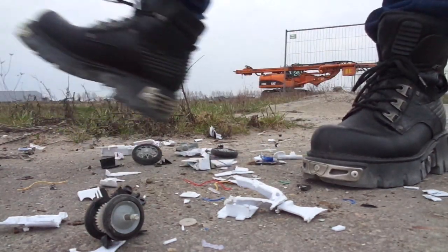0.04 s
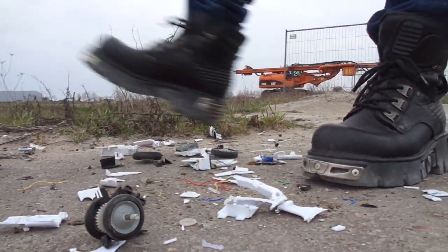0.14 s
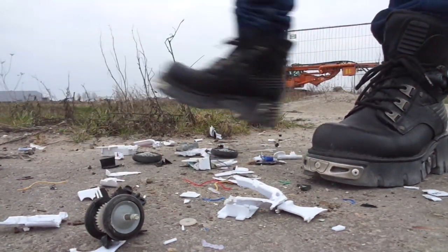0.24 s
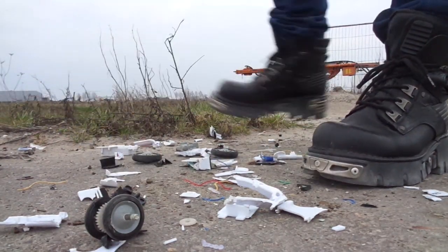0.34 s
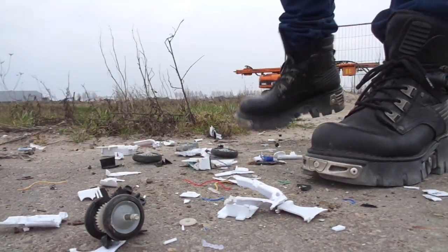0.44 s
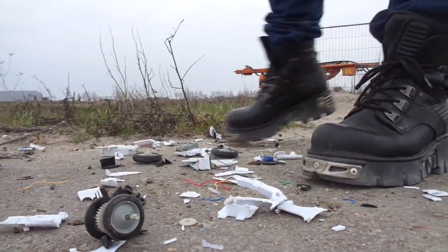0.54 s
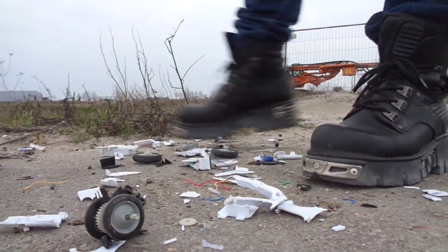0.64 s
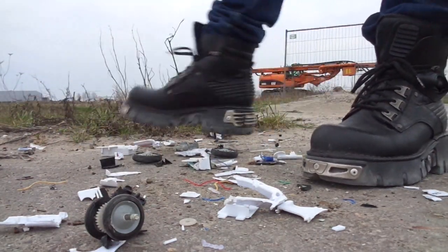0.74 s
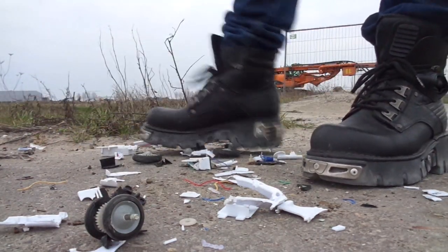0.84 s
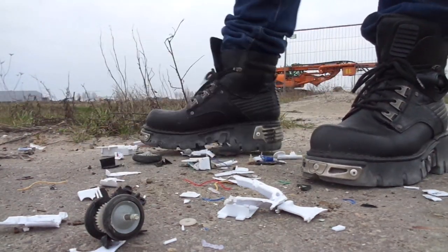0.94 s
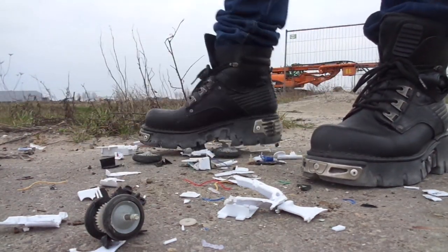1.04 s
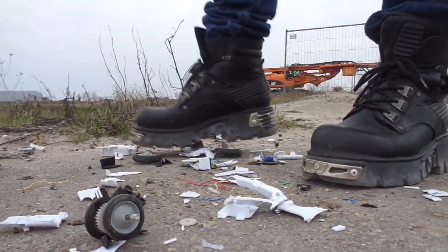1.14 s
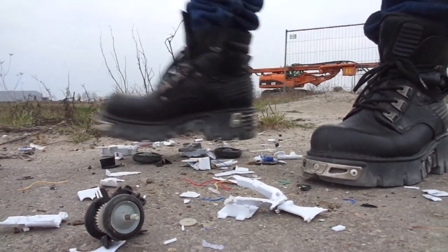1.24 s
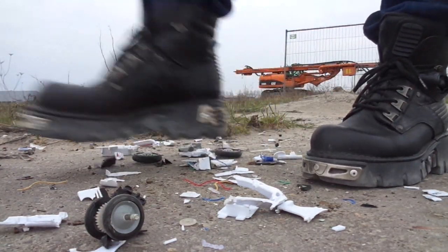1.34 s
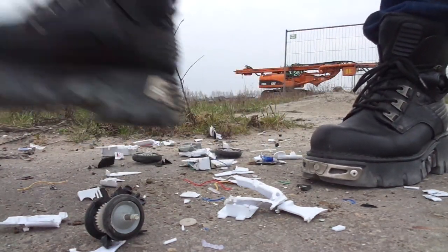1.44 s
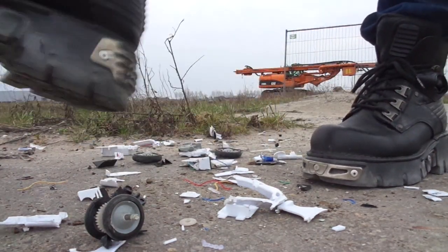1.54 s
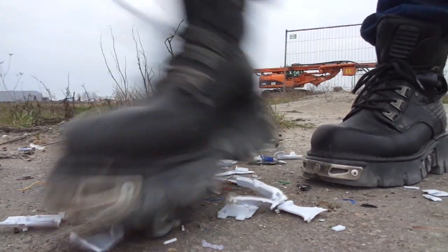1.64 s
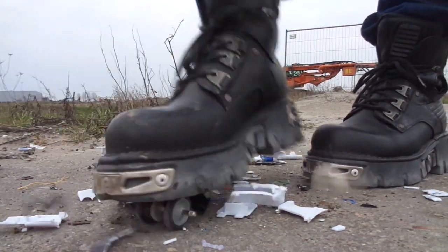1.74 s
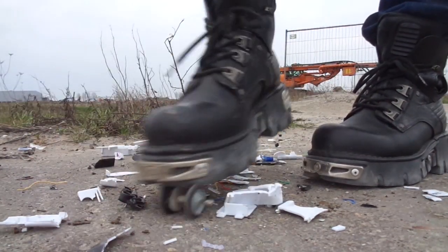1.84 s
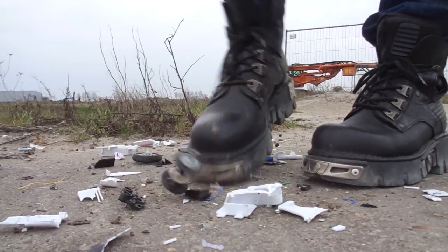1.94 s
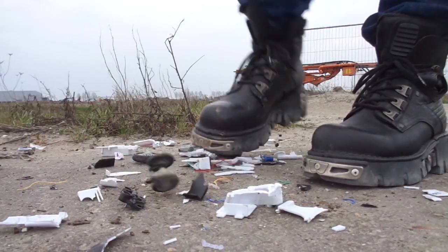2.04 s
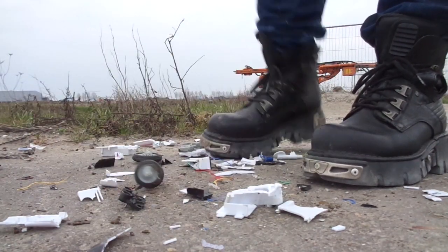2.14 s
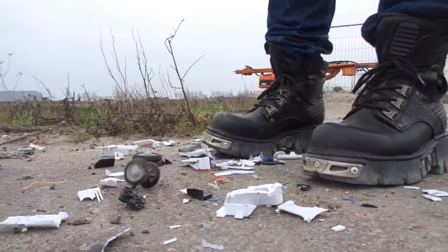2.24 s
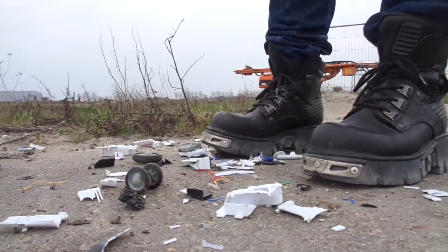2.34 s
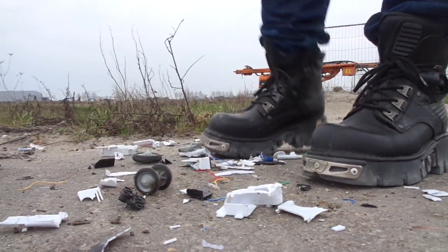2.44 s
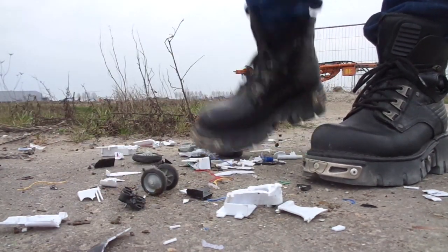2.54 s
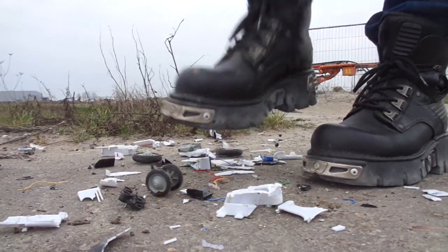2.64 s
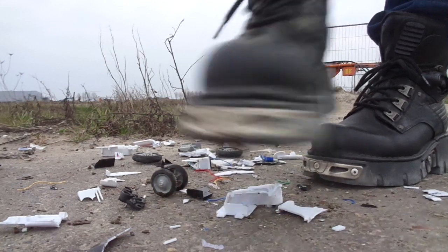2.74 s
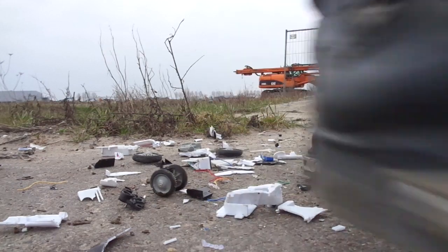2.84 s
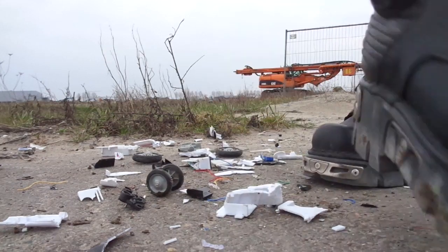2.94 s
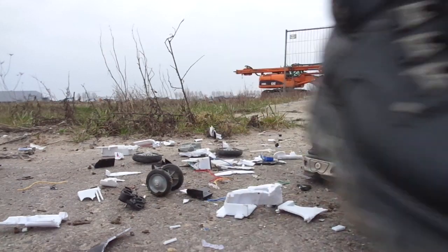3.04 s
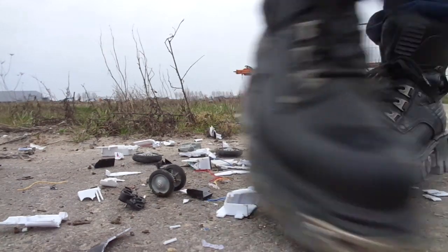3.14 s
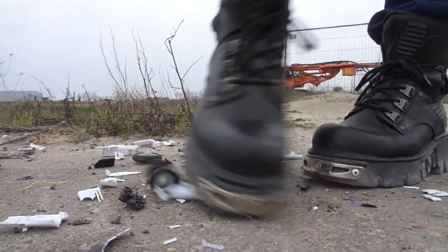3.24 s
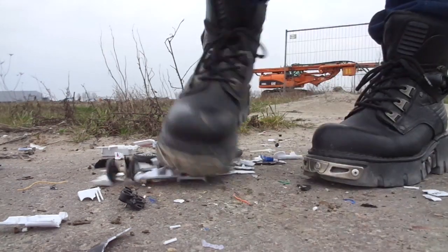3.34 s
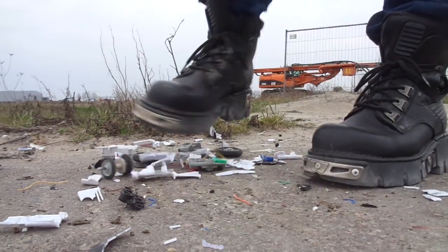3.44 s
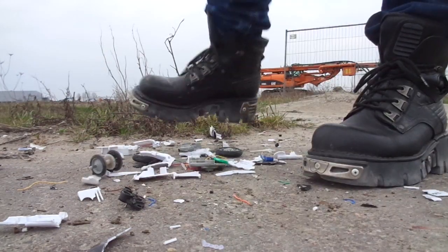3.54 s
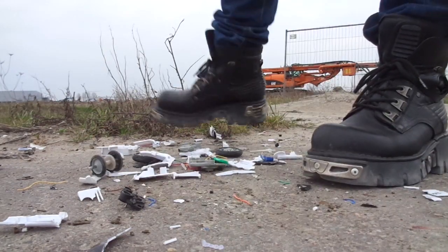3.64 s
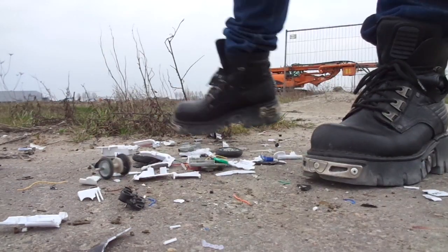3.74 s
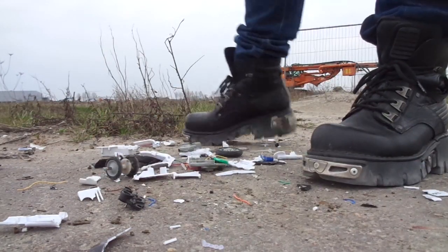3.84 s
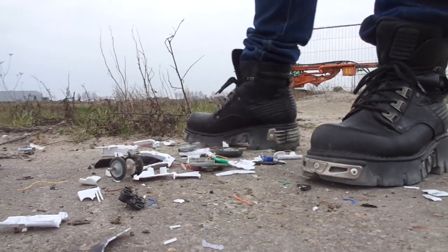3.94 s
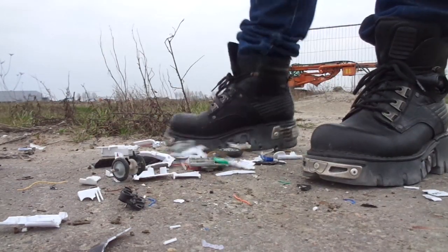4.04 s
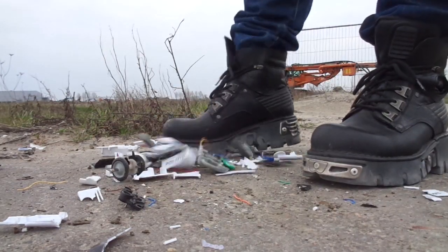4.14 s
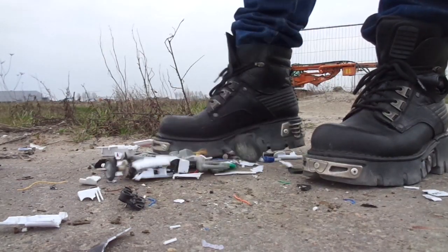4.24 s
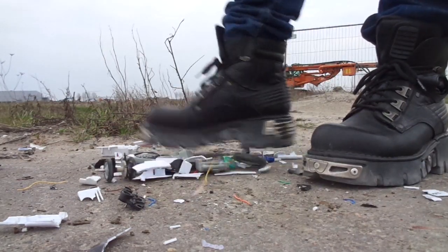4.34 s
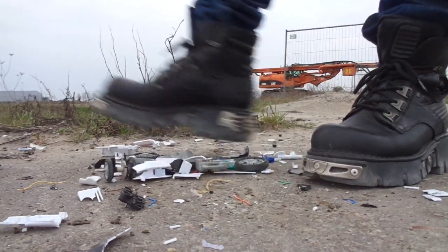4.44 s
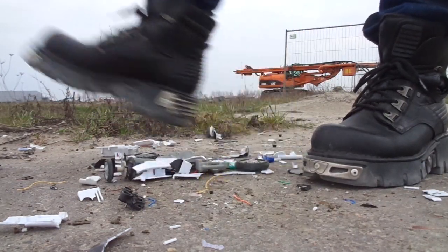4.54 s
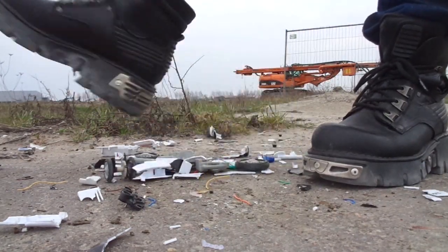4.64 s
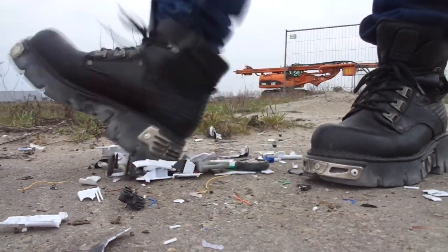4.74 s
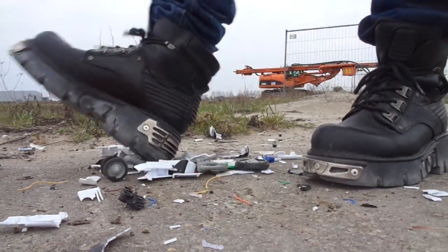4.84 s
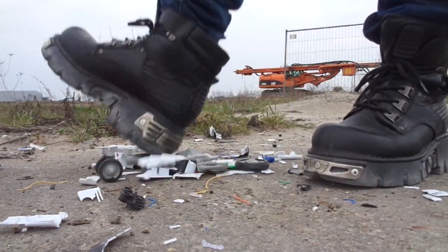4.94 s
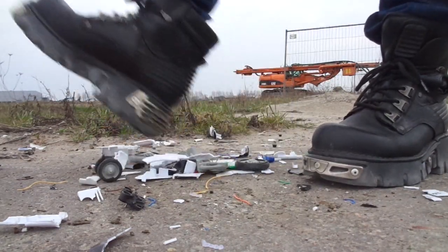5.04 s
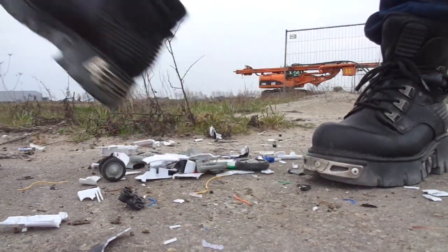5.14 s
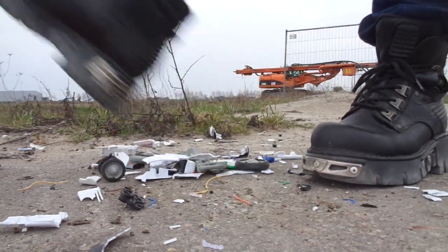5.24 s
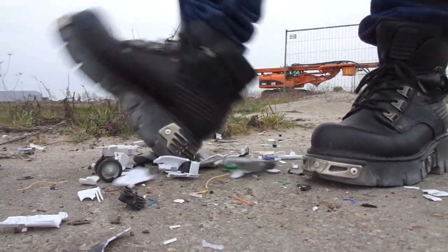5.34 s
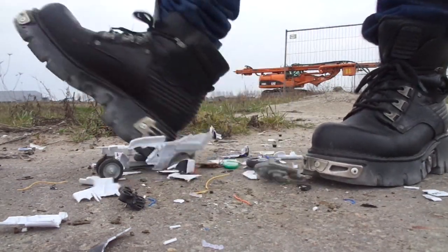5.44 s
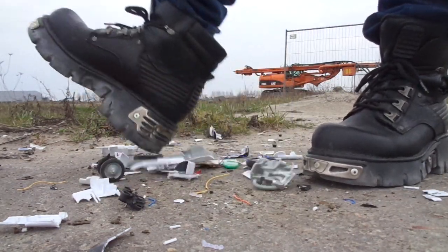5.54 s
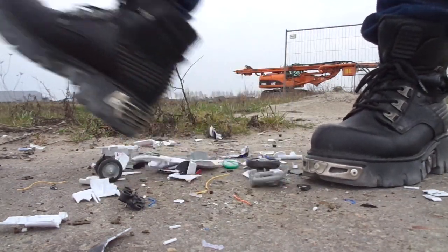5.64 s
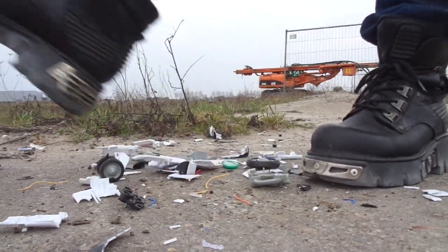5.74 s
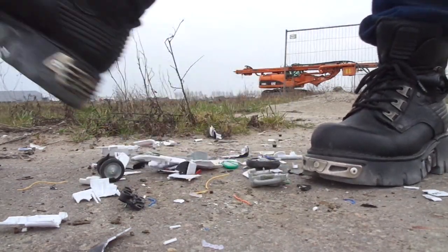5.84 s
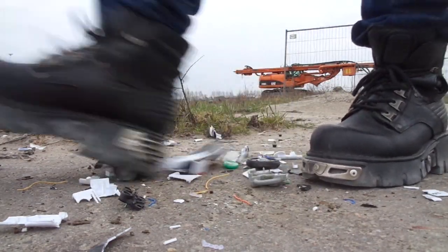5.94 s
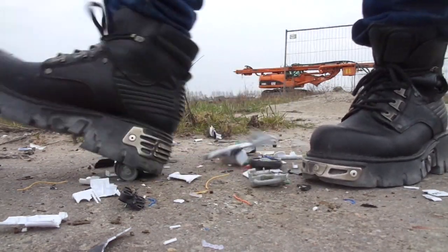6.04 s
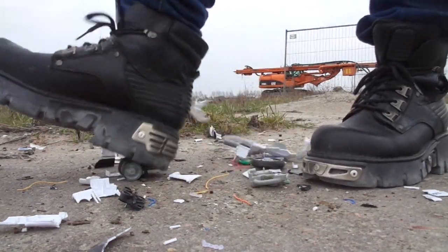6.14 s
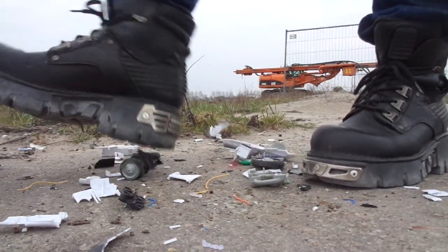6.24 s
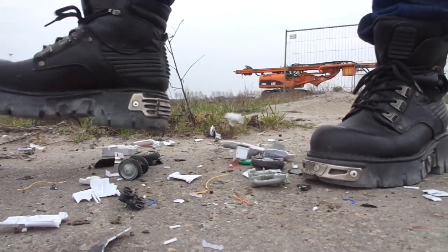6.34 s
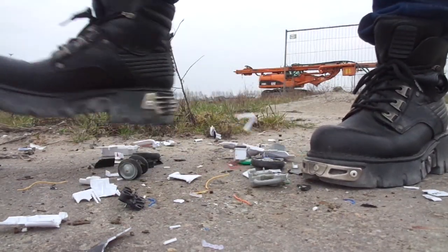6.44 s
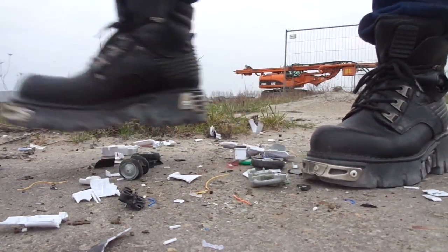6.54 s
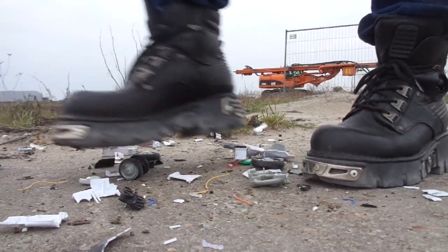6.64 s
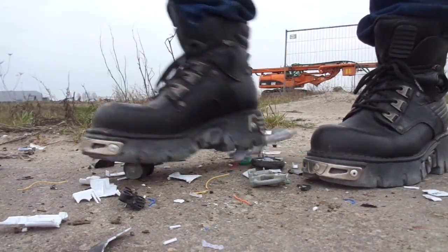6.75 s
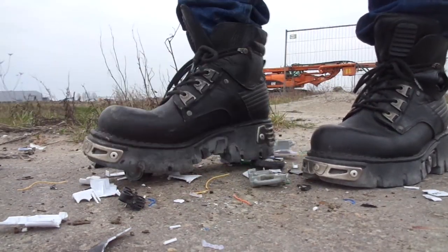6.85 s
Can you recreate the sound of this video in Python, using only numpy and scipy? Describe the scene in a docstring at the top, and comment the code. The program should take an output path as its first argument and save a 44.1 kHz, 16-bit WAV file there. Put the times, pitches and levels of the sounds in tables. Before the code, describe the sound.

Heavy boot stamps crack brittle plastic on pavement, with sharp loud snaps, crunching scrapes and clattering fragments, while a vehicle's tyre roar fades away.

```python
"""On open pavement, heard from near the ground, a heavy boot stamps on a brittle plastic toy.
Shells tear in bursts of tiny fractures, the loudest clipped; random clicks drive the plastic's ringing modes.
The sole thuds as low-filtered clicks and grinds splinters and grit; chips and loose pieces tick and clatter.
Behind it filtered noise makes the fading tyre roar and narrow whine of a receding vehicle, far traffic and breeze."""
import sys
import numpy as np
from scipy import signal
from scipy.fft import rfft, irfft
from scipy.io import wavfile
from scipy.ndimage import uniform_filter1d

SR = 44100
rng = np.random.default_rng(int(sys.argv[2]) if len(sys.argv) > 2 else 0)


def put_to_file(sound):
    """Save the sound as 16-bit audio at rate SR, in the file named by the first command-line argument."""
    columns = np.atleast_2d(sound).T  # one column per channel
    safe = np.clip(columns, -1, 1)
    whole_steps = np.round(safe * 32767)
    wavfile.write(sys.argv[1], SR, whole_steps.astype(np.int16))


N = 303849
TIME = np.arange(N) / SR
RING_SIZE = 6000  # samples in one short plastic sound
TOP_HZ = 15300
SIDE_DB = -33  # gain of the separate noise draw that is opposite in the two channels

# outdoor air, spectrum before levelling: (frequency [Hz], density [dB per Hz])
AIR_SPECTRUM = [(20, -5), (60, -12.5), (150, -25.5), (260, -11), (500, -10), (900, -5), (1400, -8.5),
                (2000, -10.5), (3300, -25), (6000, -28), (15000, -30)]
# puffs of air on the microphone: (time [s], level [dB])
AIR_PUFFS = [(.785, -46), (1.15, -55), (1.39, -48), (1.82, -44), (3.7, -52), (3.97, -52)]
AIR_DB = -48.5
BREEZE_DB, BREEZE_FADE_DB_PER_S, PUFF_HALF_WIDTH_S = -54.5, 0.87, 0.063

# tyre roar, spectrum before levelling: (frequency [Hz], density [dB per Hz])
ROAD_SPECTRUM = [(60, -34), (200, -29), (350, -9), (520, 0), (750, 8), (1050, 5), (1400, -3), (2000, -5.5),
                 (2700, -23), (4000, -38.5), (8000, -47), (15000, -51.5)]
# swells of the roar: (time [s], half width [s], level [dB])
ROAR_SWELLS = [(0.0, 0.06, -31.5), (.55, 0.21, -31.5), (.76, 0.13, -34.5), (1.268, 0.2, -32)]
# the vehicle's drive whine: (time [s], mean pitch [Hz], level before the partials' own [dB])
WHINE_PATH = [(0, 658, -44.5), (1.5, 656, -40.5), (3, 665, -44), (3.62, 667, -47.5), (3.8, 653, -42.5),
              (4.5, 626.4, -62.5), (6.89, 591, -63)]
# partials of the whine: (multiple, width [Hz], mean level [dB]); they are numbered in row order
WHINE_BANDS = [(1, 60, -15), (2, 250, -8.5), (3, 163, -4)]
ROAD_DB, ROAD_FADE_DB_PER_S = -35, 6

# ringing of the plastic: (frequency before detuning [Hz], level before a random share [dB], undamped t60 [s])
PLASTIC_MODES = [(1235, -3, 0.061), (1890, -16.5, 0.15), (2045, -10, 0.16), (2393, -15, 0.34),
                 (2714, 4, 0.039), (3021, 6, 0.043), (3335, -13, 0.032), (3926, -3.5, 0.084),
                 (4550, -9, 0.037), (4420, 4.5, 0.035), (4584, -0.5, 0.02), (4890, 1.5, 0.083),
                 (5320, 4, 0.058), (6400, 3.5, 0.031), (6900, -9.5, 0.041), (7000, 2.5, 0.022),
                 (8760, -15.5, .04), (9430, -1.5, .03)]

# larger loose pieces knocking on the pavement and each other: (time [s], level [dB], centre [Hz])
LOOSE_PIECES = [(0.058, -37, 3600), (0.101, -30.5, 3230), (0.125, -25, 5500), (0.199, -37.5, 4630),
                (0.244, -46.5, 5500), (1.08, -45.5, 6200), (1.158, -35, 3730), (1.213, -31, 2060),
                (1.84, -32, 4480), (1.916, -35, 8100), (1.967, -33, 4020), (2.142, -33, 2680),
                (2.351, -41, 2900), (2.583, -45.5, 3750), (3.024, -20, 3330), (3.168, -20, 4600),
                (3.309, -27, 3020), (3.357, -16, 4060), (3.402, -21.5, 3570), (3.424, -24.5, 4300),
                (4.076, -25.5, 3800), (4.148, -28, 3640), (4.172, -24.5, 3650), (4.202, -24, 2400),
                (4.253, -25, 4100), (4.316, -34.5, 4430), (4.967, -31, 4460), (5.053, -37, 3810),
                (5.41, -28.5, 6160), (5.436, -16.5, 4100), (5.447, -15.5, 3600), (5.477, -27, 3660),
                (5.534, -26, 4240), (5.566, -29, 4040), (5.583, -21.5, 4900), (5.622, -28.5, 3340),
                (5.67, -31, 4570), (6.035, -19.5, 3830), (6.102, -26.5, 3150), (6.125, -25, 2960),
                (6.181, -32, 4460), (6.255, -32.5, 6700), (6.355, -37.5, 6150), (6.535, -42, 4990),
                (6.751, -27, 3760), (6.8, -20, 4260), (6.858, -28, 4030)]
# colour of those knocks: (frequency [Hz], gain [dB])
CLATTER_SPECTRUM = [(200, -41), (700, 2.5), (1400, 9), (2600, -2), (5000, -6.5), (7200, -5), (8500, -5.5),
                    (11000, -9), (15000, -12)]

# splinters and grit pushed over the pavement; finer bits are brighter:
# (time [s], length [s], level [dB], tilt [dB per octave])
SCRAPE_PUSHES = [(0.036, .1, -49, 6.5), (0.193, 0.11, -58, 8.5), (0.851, 0.018, -31.5, 9.5),
                 (1.099, .13, -58, 13), (1.435, .04, -56, 5), (1.655, 0.048, -29, 4.5),
                 (1.802, 0.19, -49, 10.5), (2.0, 0.14, -52.5, 7), (2.524, 0.088, -56, -3),
                 (3.02, 0.13, -25.5, 1), (3.181, .13, -20.5, 3.3), (3.348, .16, -40, 7.5),
                 (3.953, 0.046, -47.5, 5), (4.051, 0.04, -31, -7), (4.104, .165, -32, -1.5),
                 (4.285, .08, -41.5, 2), (4.775, 0.019, -34.5, 1), (4.839, .045, -37.5, -2),
                 (4.931, 0.028, -40.5, 3.5), (5.336, 0.023, -32.5, -1.5), (5.421, 0.044, -28, -3.5),
                 (5.51, .15, -43.5, -3.5), (5.96, 0.032, -19, 4.5), (5.997, 0.13, -37, -3),
                 (6.158, 0.064, -41.5, -1.5), (6.269, .15, -55, -1), (6.76, 0.056, -33.5, -4)]
# colour of the grinding before levelling: (frequency [Hz], gain [dB])
GRIND_SPECTRUM = [(150, -15), (500, -6), (1200, -5), (2200, -5.5), (3200, -4.5), (5000, -10), (7000, -9.5),
                  (8500, -17.5), (10500, -17.5), (12000, -24), (15000, -26)]
SCRAPE_ATTACK_S, SCRAPE_RELEASE_S = 0.017, 0.016
# stirred-up bits trickle on after each scrape, the more the longer it lasted
TRICKLE_DB, TRICKLE_S = -12, 0.035
# the weight on the standing boot keeps a trace of grit moving; tilt in dB per octave
RESTING_GRIT_DB, RESTING_TILT_DB = -68.5, 0.5
CATCH_DB = 4.5  # how unevenly splinters of each size catch and let go

# small chips flick away at random; level relative to the grinding, which they trail by their flight time
CHIPS_PER_S, CHIP_DB, CHIP_SPREAD_DB, CHIP_FLIGHT_S = 50, -1, 3.5, 0.017
CHIP_HZ, CHIP_SPREAD_OCTAVES = 4330, 0.54  # spread is each way

# the rubber sole pressing down: (time [s], push time [s], level [dB], centre [Hz])
SOLE_PUSHES = [(0.764, 0.055, -43, 137), (0.853, 0.014, -35, 296), (1.663, 0.0094, -20, 294),
               (1.673, 0.016, -17, 1050), (1.767, 0.062, -40.5, 150), (1.904, 0.04, -43.5, 166),
               (3.045, 0.1, -27.5, 305), (3.19, 0.12, -57, 453), (3.974, 0.028, -35, 791),
               (4.762, 0.012, -30, 220), (5.332, 0.022, -50, 300), (5.965, 0.0051, -20, 274),
               (6.729, 0.0043, -33, 403)]
# spectrum of the sole: (multiple of its centre, gain [dB])
SOLE_SPECTRUM = [(.4, -34.5), (.75, -10.5), (.95, 0), (1.3, -8), (1.7, -11), (3, -21), (8, -47), (30, -77)]

# plastic shells breaking:
# (time [s], nominal tearing time [s], level [dB], centre [Hz], level of the flexing shell [dB], resonance [Q])
SHELL_CRACKS = [(0.849, 0.0056, -17, 2680, -16.5, 1), (0.853, 0.0032, -1.5, 2920, -19, 1.7),
                (0.8595, 0.0065, -8, 3550, -14, 0.3), (0.8785, 0.012, -31.5, 2820, -28, 0.47),
                (1.661, 0.0081, -10.5, 5830, -14, 0.47), (1.6738, 0.0011, -10.5, 1900, -9, 3.6),
                (1.6855, 0.0012, -10, 5350, -14.5, 0.25), (1.701, .0017, -8, 1910, -10, 1.1),
                (1.957, 0.0034, -28.5, 3400, -33.5, 7.1), (2.166, 0.0028, -22, 1800, -32.5, 5.2),
                (3.004, 0.012, -25, 2460, -38, 0.69), (3.0397, 0.0059, -12, 3000, -26, 1.5),
                (3.0805, 0.0047, -13.5, 2380, -23, 3.5), (3.1285, 0.00078, -9.5, 3970, -33, 2.8),
                (3.188, 0.0087, -15.5, 4440, -31, 5.8), (3.211, 0.0045, -18, 3200, -28, 2.6),
                (3.3432, 0.0015, -7.5, 4200, -22.5, 1.76), (4.058, 0.018, -23.5, 3300, -35, 0.82),
                (4.115, 0.011, -20, 4180, -31.5, 1.2), (4.7611, .009, -6.5, 3280, -29, 0.55),
                (4.77, 0.003, 5.5, 5800, -20, 4.9), (4.7813, 0.0042, -17, 5200, -25.5, 0.6),
                (5.3302, .011, 0.5, 3200, -19, 0.89), (5.342, 0.0028, -11.5, 2800, -16, 1.23),
                (5.951, .0021, -6.5, 6500, -18.5, 4.4), (5.968, 0.0055, -14.5, 4200, -16.5, 1.6),
                (5.9783, 0.014, -12, 4330, -33, 2), (6.7821, 0.0069, -18.5, 4200, -36.5, 3.1)]
# colour of a crack: (frequency [Hz], gain [dB])
CRACK_SPECTRUM = [(200, -24.5), (700, -13.5), (1400, 4), (2600, 2.5), (5000, -3.5), (7200, 1.5),
                  (8500, -2.5), (11000, -6.5), (15000, -8.5)]
# a shell buckles under the sole in a quick run of snaps, all in one band
BUCKLE_START_S, BUCKLE_SNAPS_PER_S, BUCKLE_SCATTER_S = 3.0505, 75, 0.001
BUCKLE_TEAR_S, BUCKLE_DB, BUCKLE_HZ, BUCKLE_FLEX_DB, BUCKLE_Q = 0.0041, -19, 2440, -27.5, 5


def undb(db):
    """Decibels to amplitude."""
    return 10 ** (np.asarray(db) / 20)


def unit(x):
    """Scale to rms 1."""
    return x / np.sqrt(np.mean(x ** 2))


def burst(x, db, length):
    """Give x the energy of a sound that holds db for length seconds."""
    return x * undb(db) * np.sqrt(length * SR / np.sum(x ** 2))


def curve(rows, axis=1):
    """One column of a table over time, joined by straight lines."""
    rows = np.array(rows)
    return np.interp(TIME, rows[:, 0], rows[:, axis])


def add(out, s, x):
    """Mix x into out at s seconds."""
    i = max(int(s * SR), 0)
    out[i:i + len(x)] += x[:max(N - i, 0)]


def swell(s, width):
    """A smooth rise and fall around s seconds."""
    return np.exp(-((TIME - s) / width) ** 2)


def walk(rate):
    """Slow random wander with rms 1, about rate new targets a second."""
    targets = np.interp(TIME * rate, np.arange(2000), rng.standard_normal(2000))
    return unit(uniform_filter1d(targets, int(SR / rate)))


def band(x, hz, q):
    """Two-pole resonance, gain 1 at the centre; centre and bandwidth stay within 0.4 of the sample rate."""
    limit = 0.4 * SR
    hz = min(hz, limit)
    b, a = signal.iirpeak(hz, max(q, hz / limit), fs=SR)
    return signal.lfilter(b, a, x)


def colour(x, points, size=4096):
    """Causal minimum-phase filter with the spectrum of (Hz, dB) points."""
    hz, db = np.transpose(points)
    bins = np.fft.rfftfreq(size, 1 / SR) + 1
    gain = undb(np.interp(np.log(bins), np.log(hz), db))
    # folding the cepstrum forward puts the energy as early as possible
    cepstrum = irfft(np.log(gain))
    cepstrum[1:size // 2] *= 2
    cepstrum[size // 2 + 1:] = 0
    response = irfft(np.exp(rfft(cepstrum)))
    return signal.fftconvolve(x, response)[:len(x)]


def grains(rate, spread_db, size):
    """Random clicks of either sign: many small and a few large, or the reverse for a negative spread."""
    chance, strength, sign = rng.random((3, size))
    strength = np.minimum(-np.log(1 - strength), 4)
    return (chance < rate / SR) * undb(spread_db * strength) * np.sign(sign - 0.5)


def piece(ring_db, detune=0.034, damping=1, contact_s=0.0006):
    """Response of one piece of plastic: a rough, hard click plus its own mix of decaying modes."""
    hz, db, t60 = np.transpose(PLASTIC_MODES)[:, :, None]
    shift, share = rng.standard_normal((2, len(PLASTIC_MODES), 1))
    t = np.arange(RING_SIZE) / SR
    tones = np.sin(2 * np.pi * hz * (1 + detune * shift) * t)
    decay = np.exp(-np.log(1000) * t * damping / t60)
    ring = np.sum(share * undb(db) * tones * decay, axis=0)
    click = rng.standard_normal(RING_SIZE) * np.exp(-t / contact_s)
    return unit(click) + undb(ring_db) * unit(ring)


def air():
    """Far traffic as coloured noise, and a light breeze fluttering low on the microphone, with puffs of air
    pushed by the moving boot."""
    far = unit(colour(rng.standard_normal(N), AIR_SPECTRUM)) * undb(AIR_DB + 0.5 * walk(1.7))
    rumble = band(band(rng.standard_normal(N), 47, q=0.7), 68, q=0.7)
    breeze = unit(rumble * undb(3.4 * walk(15)))
    strength = undb(BREEZE_DB - BREEZE_FADE_DB_PER_S * TIME)
    strength = strength + sum(undb(db) * swell(s, PUFF_HALF_WIDTH_S) for s, db in AIR_PUFFS)
    return far + breeze * strength


def roar_level():
    """Strength of the tyre roar: a steady fade as the vehicle recedes, with swells added in power."""
    receding = undb(ROAD_DB - ROAD_FADE_DB_PER_S * TIME)
    swells = sum((undb(db) * swell(s, width)) ** 2 for s, width, db in ROAR_SWELLS)
    return np.sqrt(receding ** 2 + swells)


def vehicle():
    """Tyre roar is coloured noise; the whine is narrow noise bands on carriers that sink in pitch overall."""
    roar = unit(colour(rng.standard_normal(N), ROAD_SPECTRUM)) * roar_level() * undb(2.0 * walk(10))
    pitch = curve(WHINE_PATH) * (1 + 0.009 * walk(13))
    phase = 2 * np.pi * np.cumsum(pitch) / SR
    whine = 0
    for k, (_, width, db) in enumerate(WHINE_BANDS, 1):
        low_pass = signal.butter(2, width / 2, fs=SR, output="sos")
        a, b = signal.sosfilt(low_pass, rng.standard_normal((2, N)))
        partial = unit(a * np.cos(k * phase) + b * np.sin(k * phase))
        whine = whine + undb(db + 2.0 * walk(9)) * partial
    return roar + whine * undb(curve(WHINE_PATH, axis=2))


def clatter():
    """Each loose piece lands on a corner, chatters down onto its side and rings briefly at its own pitch."""
    out, t = np.zeros(N), np.arange(RING_SIZE) / SR
    for s, db, hz in LOOSE_PIECES:
        landing = grains(rate=7000, spread_db=-1.0, size=RING_SIZE) * np.exp(-(t / 0.0035) ** 2)
        chatter = grains(rate=1500, spread_db=-1.5, size=RING_SIZE) * t * np.exp(-t / 0.0046)
        contact = unit(landing) + undb(-4) * unit(chatter)
        body = piece(ring_db=-10.0, detune=0.05, damping=1.12, contact_s=0.00029)
        ring = signal.fftconvolve(contact, body)[:RING_SIZE]
        knock = colour(band(ring, hz, q=2.52), CLATTER_SPECTRUM)
        add(out, s, burst(knock, db, 0.0053))
    return out


def scraping():
    """Level and tilt of the grinding: each scrape bites, holds and lets go, then its debris trickles to rest."""
    total = np.zeros((2, N))  # power, and power times tilt
    t = np.arange(SR // 2) / SR
    for s, length, db, tilt in SCRAPE_PUSHES:
        attack = np.minimum(t / SCRAPE_ATTACK_S, 1)
        release = np.exp(-np.maximum(t - length, 0) / SCRAPE_RELEASE_S)
        power = (undb(db) * attack * release) ** 2
        add(total[0], s, power)
        add(total[1], s, tilt * power)
    keep, resting = np.exp(-1 / (TRICKLE_S * SR)), undb(RESTING_GRIT_DB) ** 2
    trickle = signal.lfilter([1 - keep], [1, -keep], total)
    power, brightness = total + undb(TRICKLE_DB) ** 2 * trickle
    level_db = 10 * np.log10(power + resting)
    tilt = (brightness + resting * RESTING_TILT_DB) / (power + resting)
    return level_db, tilt


def chips(count=8):
    """Small chips tick at random times in a few registers, each register with its own ring, as loud as the sole
    has stirred them."""
    db, _ = scraping()
    stirred = undb(np.interp(TIME - CHIP_FLIGHT_S, TIME, db) + CHIP_DB)
    out = np.zeros(N)
    for octave in np.linspace(-1, 1, count) * CHIP_SPREAD_OCTAVES:
        body = piece(ring_db=-1.5, detune=0.04, damping=1.3, contact_s=0.0011)
        tick = burst(band(body, CHIP_HZ * 2 ** octave, q=1.82), 0, 0.0044)
        waits = rng.exponential(count / CHIPS_PER_S, 100)
        sizes = rng.uniform(-1, 1, 100)
        for s, size in zip(np.cumsum(waits), sizes):
            if s < TIME[-1]:
                add(out, s, tick * stirred[int(s * SR)] * undb(CHIP_SPREAD_DB * size))
    return out


def grinding(count=14):
    """Splinters catch and slip under the same sole, each in its own register, over fine grit."""
    db, tilt = scraping()
    # hard grinding is a dense crunch; as it eases, single slips stand apart
    crowding = undb(0.5 * (np.maximum(db, -45) + 23))
    judder, splinters = 2.12 * walk(110), 0  # judder in dB
    for hz in np.geomspace(1100, 12000, count):
        slips = grains(rate=300 * crowding, spread_db=2.0, size=N)
        slips = slips * undb(judder + CATCH_DB * walk(80)) / np.sqrt(crowding)
        body = piece(ring_db=-6.0, detune=0.01, damping=2.0, contact_s=0.0016)
        body = band(band(body, hz, q=2.1), hz, q=0.94)
        register = unit(signal.oaconvolve(slips, body)[:N])
        # smaller splinters ring over a wider band, hence the square root; tilt pivots at 4 kHz
        splinters = splinters + np.sqrt(hz) * register * undb(tilt * np.log2(hz / 4000))
    grit = grains(rate=6000 * crowding, spread_db=2.0, size=N) * undb(judder) / np.sqrt(crowding)
    crunch = unit(splinters) + undb(-2) * unit(grit)
    return unit(colour(crunch, GRIND_SPECTRUM)) * undb(db)


def thuds():
    """The lugs of the sole knock and judder against the ground; rubber favours the lows."""
    out, t = np.zeros(N), np.arange(SR // 2) / SR
    for s, length, db, hz in SOLE_PUSHES:
        push = grains(rate=3100, spread_db=3, size=len(t)) * np.exp(-(t / length) ** 2)
        thud = colour(push, np.array(SOLE_SPECTRUM) * [hz, 1])
        add(out, s, burst(thud, db, length))
    return out


def buckling(count=5):
    """Nearly regular snaps of a folding shell, as rows like those of SHELL_CRACKS."""
    scatter = BUCKLE_SCATTER_S * rng.standard_normal(count)
    times = BUCKLE_START_S + np.arange(count) / BUCKLE_SNAPS_PER_S + scatter
    return [(s, BUCKLE_TEAR_S, BUCKLE_DB, BUCKLE_HZ, BUCKLE_FLEX_DB, BUCKLE_Q) for s in times]


def cracks():
    """A tear runs through the shell as a rush of tiny fractures; the wall flexes, the freed piece rings on."""
    out, t = np.zeros(N), np.arange(RING_SIZE) / SR
    for s, length, db, hz, flex_db, q in SHELL_CRACKS + buckling():
        onset = 1 - np.exp(-t / 0.00064)
        fall = np.exp(-(t / (0.86 * length)) ** 2) + undb(-13.5) * np.exp(-t / 0.0058)
        tear = grains(rate=9200, spread_db=3.5, size=RING_SIZE) * onset * fall
        wall = piece(ring_db=-8, detune=0.03, damping=4.8, contact_s=0.00001)
        shell = signal.fftconvolve(tear, wall)[:RING_SIZE]
        snap = colour(band(shell, hz, q), CRACK_SPECTRUM)
        flex = band(band(tear, 850, q=1.0), 700, q=0.25)
        ring = band(piece(ring_db=12.5, detune=0.024, damping=1.4), 0.32 * hz, q=0.4)
        add(out, s, burst(snap, db, length))
        add(out, s, burst(flex, flex_db, length))
        add(out, s, burst(ring, db - 28.5, length))
    return out


def scene():
    """Everything sits in the middle; a faint separate noise draw, opposite in the channels, adds slight width."""
    near = cracks() + clatter() + thuds() + grinding() + chips()
    width = undb(SIDE_DB) * air() * np.array([[1], [-1]])
    return near + vehicle() + air() + width


def record(dry):
    """The microphone overloads: the loudest peaks clip hard, then a low-pass cuts the top."""
    low_pass = signal.firwin(255, TOP_HZ, window="blackman", fs=SR)
    clipped = np.clip(dry, -0.9, 0.9)
    return signal.oaconvolve(clipped, low_pass[None], mode="same", axes=1)


dry = scene()
out = record(dry)
put_to_file(out)
```